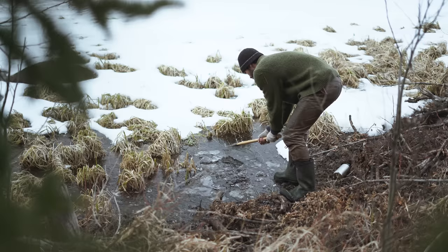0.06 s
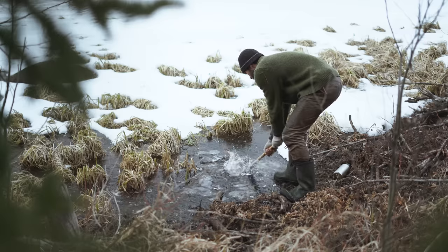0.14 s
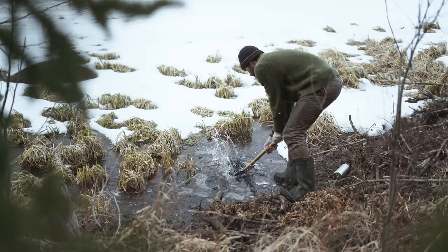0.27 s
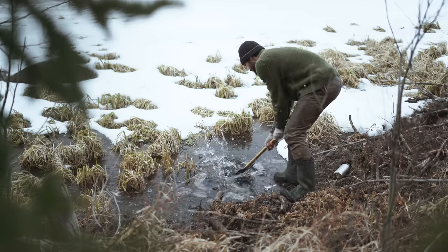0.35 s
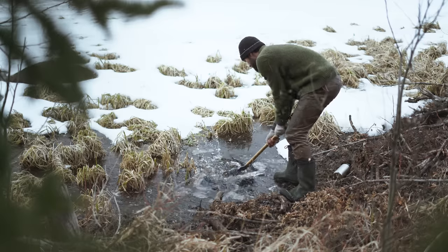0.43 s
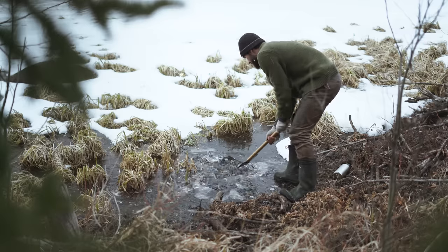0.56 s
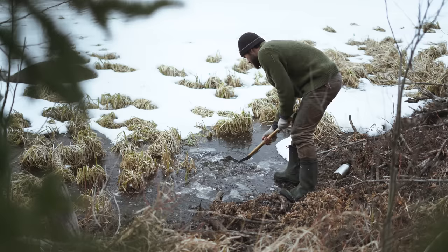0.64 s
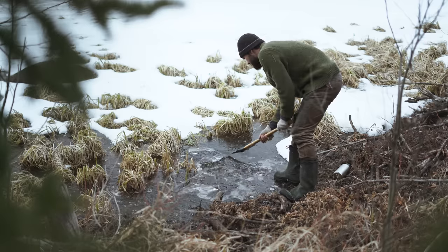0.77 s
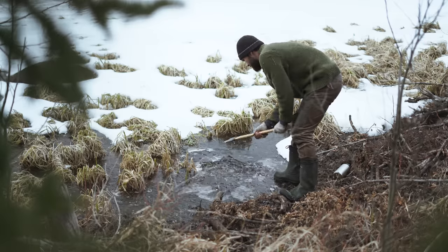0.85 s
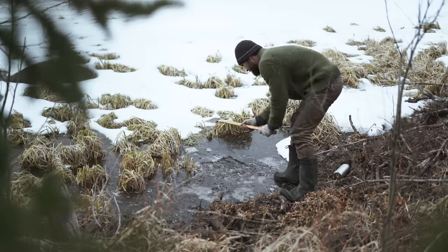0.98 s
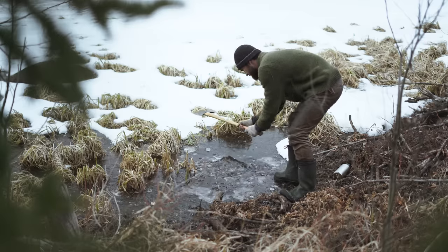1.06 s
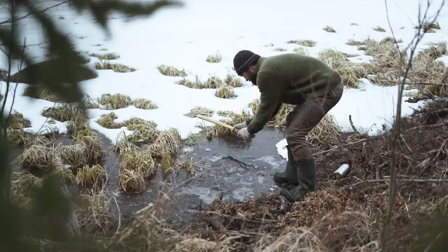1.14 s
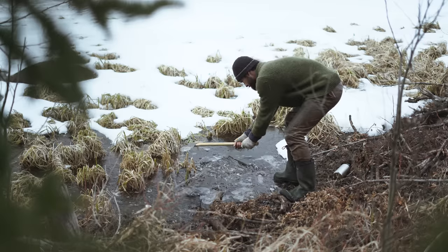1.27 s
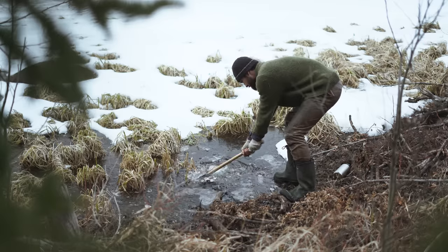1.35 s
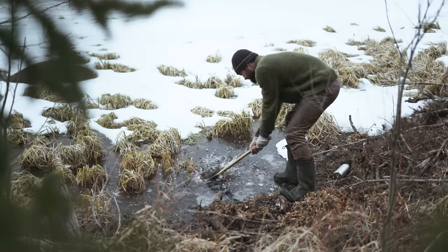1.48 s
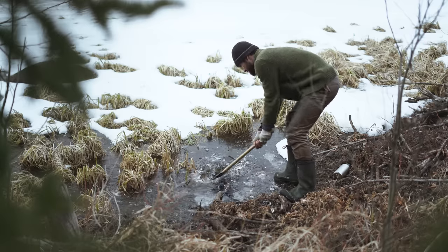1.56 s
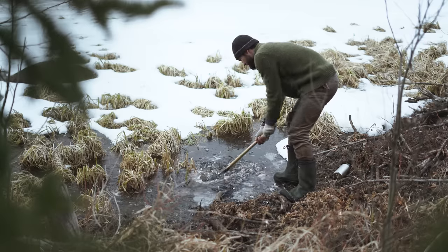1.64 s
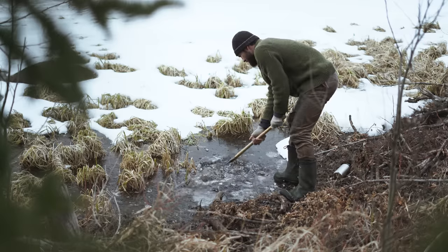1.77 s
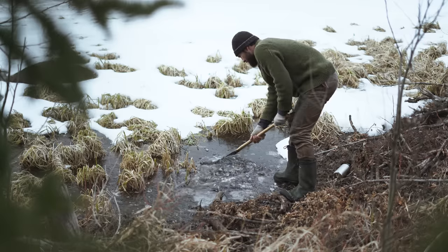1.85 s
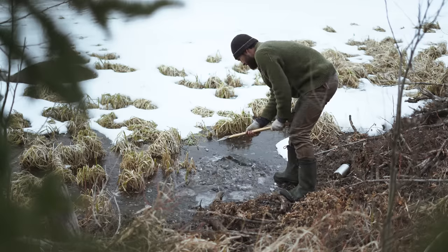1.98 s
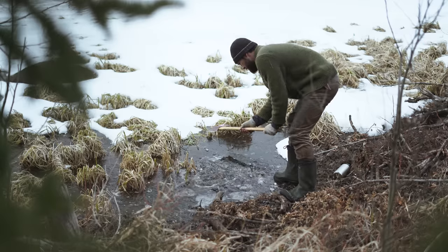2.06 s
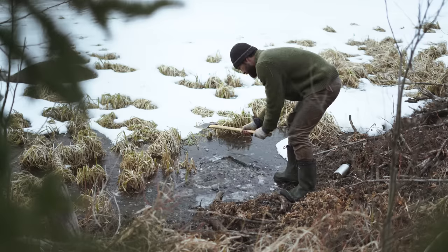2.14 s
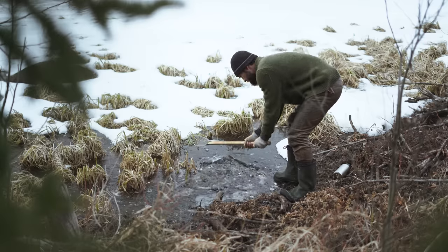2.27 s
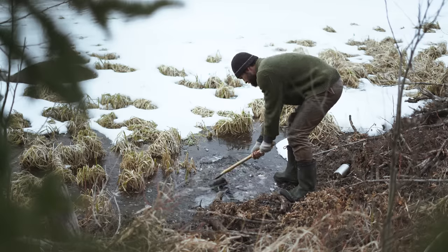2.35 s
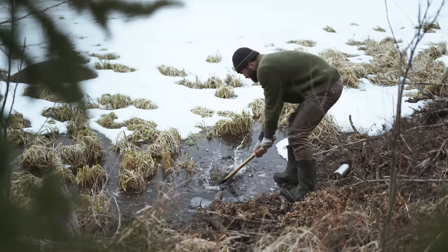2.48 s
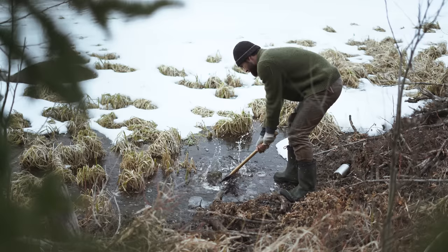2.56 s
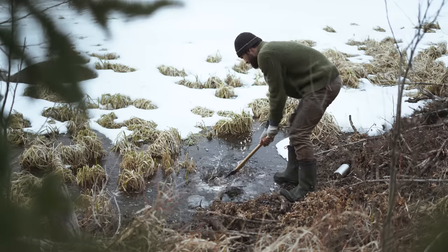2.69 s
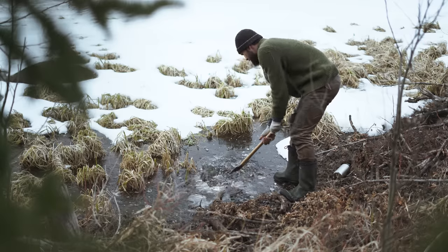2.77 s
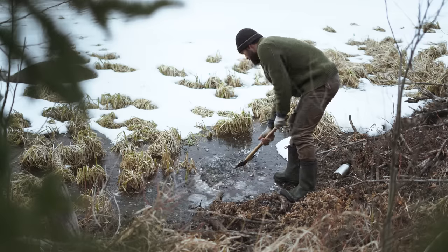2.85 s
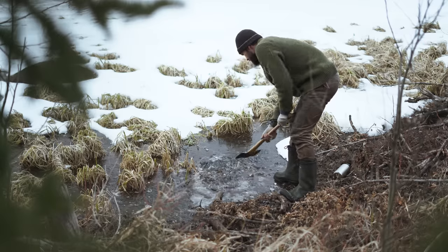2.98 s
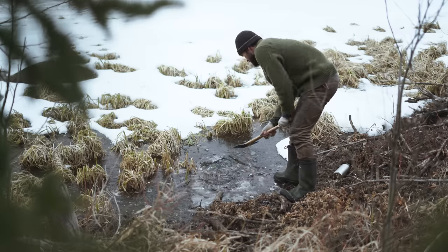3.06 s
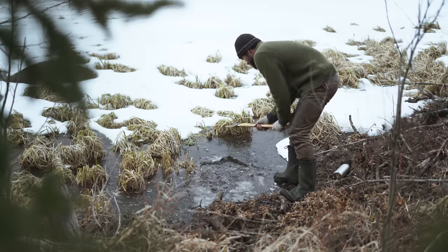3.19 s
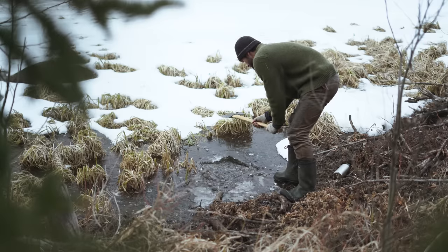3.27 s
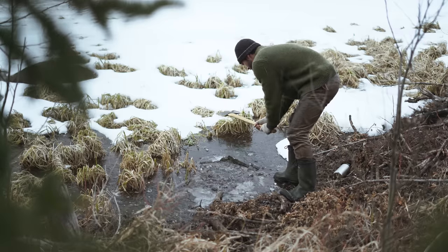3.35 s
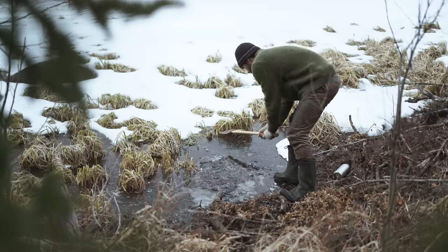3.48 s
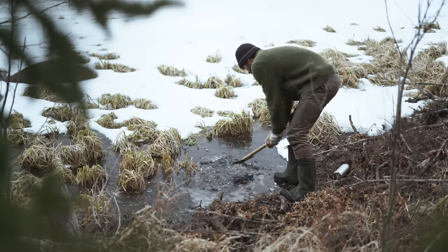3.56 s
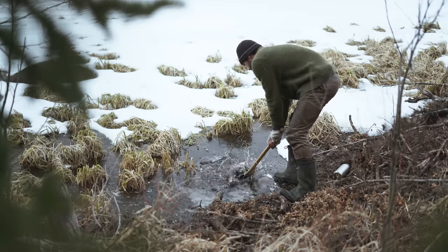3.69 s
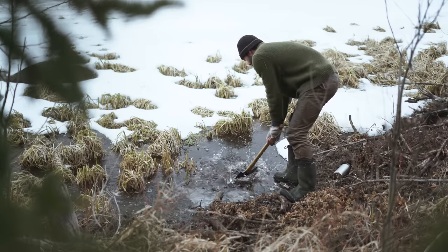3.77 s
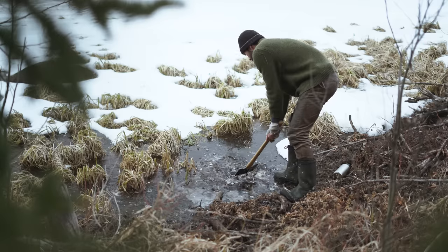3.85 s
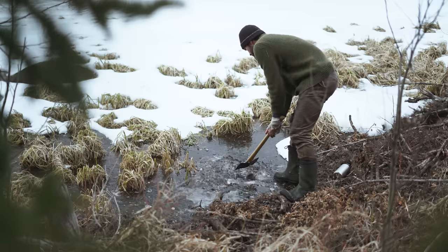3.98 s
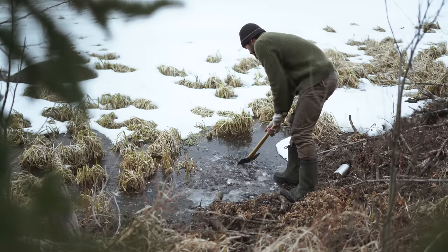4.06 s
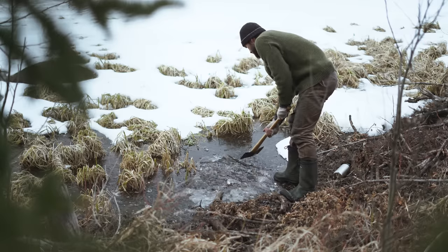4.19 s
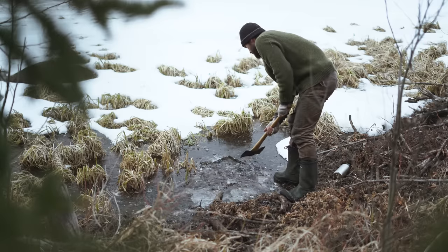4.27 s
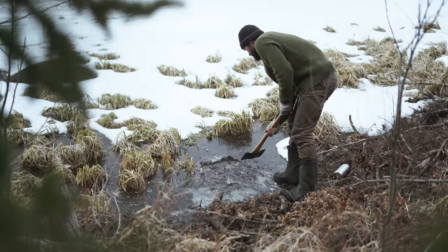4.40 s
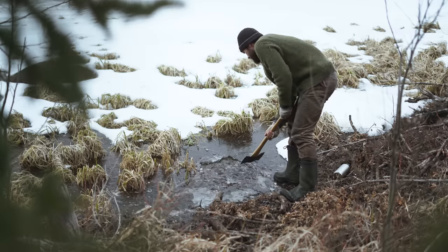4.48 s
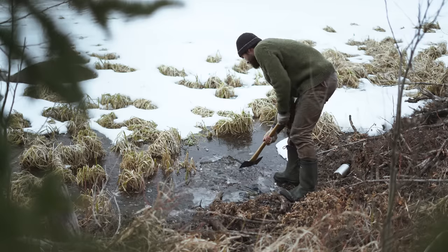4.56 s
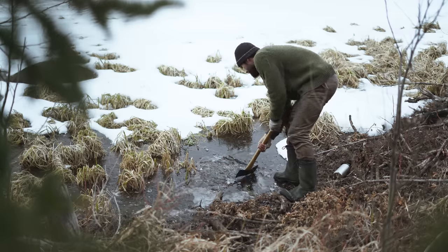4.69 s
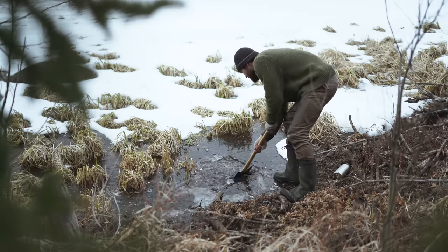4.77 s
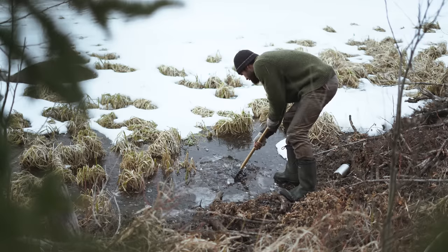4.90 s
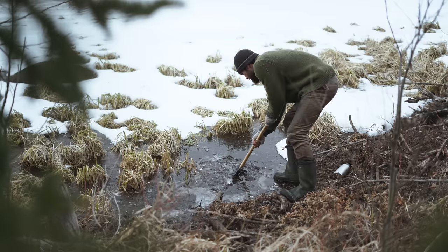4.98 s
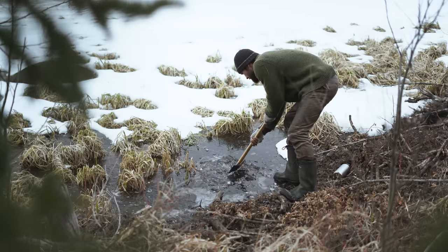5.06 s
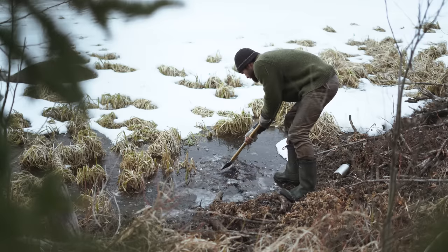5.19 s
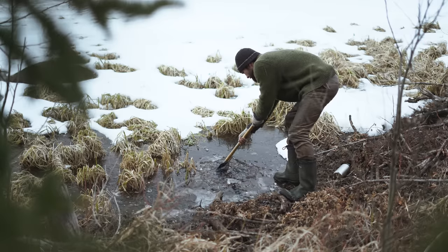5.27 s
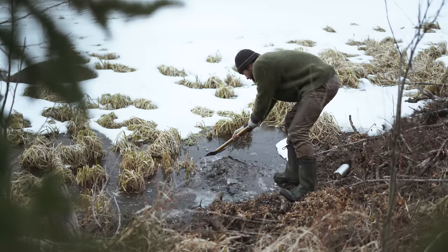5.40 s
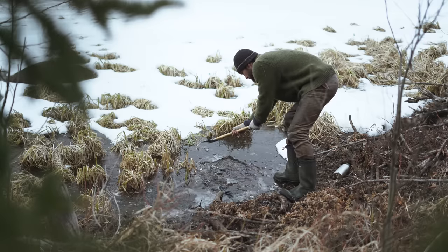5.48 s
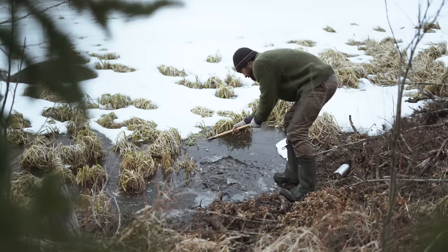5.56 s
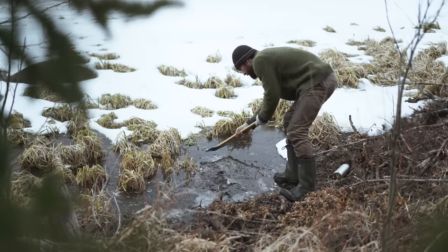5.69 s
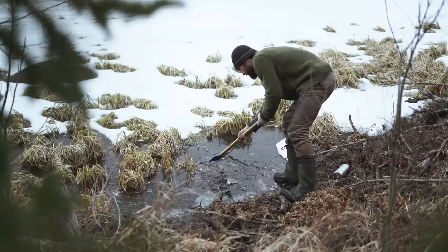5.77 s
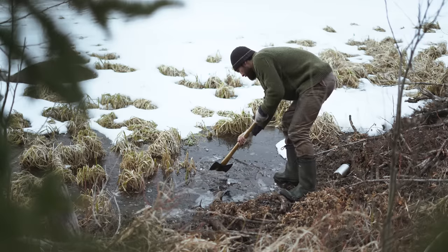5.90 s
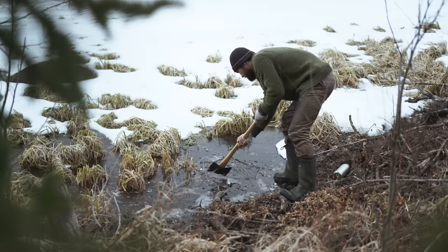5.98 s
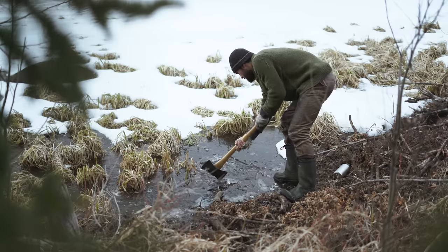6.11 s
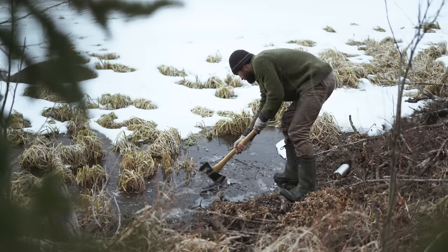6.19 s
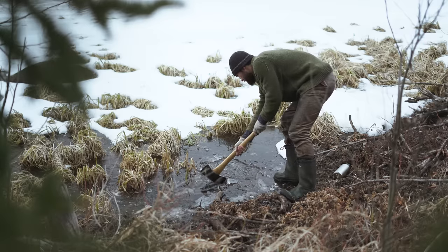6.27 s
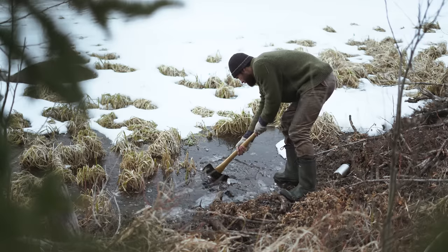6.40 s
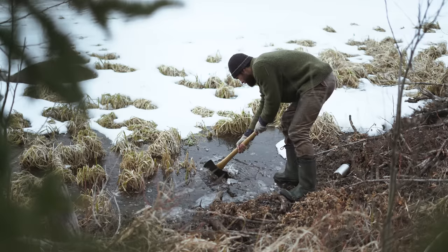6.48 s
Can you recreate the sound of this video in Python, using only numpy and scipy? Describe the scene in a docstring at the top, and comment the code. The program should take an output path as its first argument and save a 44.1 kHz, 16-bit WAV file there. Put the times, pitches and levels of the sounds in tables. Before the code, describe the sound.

Four hard chops crunch through thin ice into shallow water, shards and drops pattering back, followed by softer sloshing, bubbles and faint steel clinks.

```python
"""At the edge of a marsh an axe breaks thin ice four times, then stirs the floating pieces.
Fracture is a dense burst of tiny blips; single cracks and knocks are filtered impulses with a brief ring.
Water and shards rain back as bubbly grains and filtered noise, bubbles glide upward and the steel head
clinks in its modes. A near-mono microphone hears it over distant outdoor hush and light wind, clipping
at full scale."""
import sys
import numpy as np
from scipy import signal
from scipy.fft import rfft, irfft
from scipy.io import wavfile
from scipy.ndimage import uniform_filter1d

SR = 44100
rng = np.random.default_rng(int(sys.argv[2]) if len(sys.argv) > 2 else 0)


def master_out(mix):
    """Clip the mix to full scale and print it as 16-bit PCM to the path in sys.argv[1]."""
    frames = np.transpose(np.atleast_2d(mix))
    ceiling = np.clip(frames, -1, 1)
    pcm = np.round(ceiling * 32767).astype(np.int16)
    wavfile.write(sys.argv[1], SR, pcm)


N = 288414  # samples

# spectrum of treble spit, fizz and fine spray: (frequency [Hz], relative level [dB])
FIZZ_SPECTRUM = [(4000, 1), (6500, -10), (8000, -6.5), (11000, -3), (16000, -8)]
# spectrum of bright splintering, snaps and pattering drops: (frequency [Hz], relative level [dB])
SPLINTER_SPECTRUM = [(1200, -19.5), (2400, 7), (3400, 8.5), (4500, 5), (5200, -10), (6000, -23),
                     (8000, -54)]
# spectrum of dull knocks and gurgling water: (frequency [Hz], relative level [dB])
KNOCK_SPECTRUM = [(40, -78), (150, -26.5), (300, -10), (700, 2), (1600, 2.5), (2600, 0), (4000, -37.5)]


def amp(db):
    """Level: 20 dB is a tenfold amplitude ratio."""
    return 10 ** (np.asarray(db) / 20)


def evened(x):
    """Normalization: scales the mean power, and so the rms, to 1."""
    return x / np.sqrt(np.mean(x ** 2) + 1e-20)


def smoothed(x, width):
    """Low-pass filtering: two moving averages leave a slow random drift of rms 1."""
    return evened(uniform_filter1d(uniform_filter1d(x, width), width))


def read(points, hz):
    """Spectral interpolation: a table is read along a log-frequency axis."""
    f, value = np.transpose(points)
    return np.interp(np.log(hz + 1), np.log(f + 1), value)


def add(mix, s, sound):
    """Superposition: adds a sound to the mix from s seconds on."""
    part = mix[round(s * SR):][:len(sound)]
    part += sound[:len(part)]


def colour(points):
    """Minimum-phase filtering: the Hilbert transform of log gain gives causal taps, here of peak 1."""
    hz = abs(np.fft.fftfreq(4096, 1 / SR))
    log_gain = np.log(amp(read(points, hz)))
    response = np.exp(np.conj(signal.hilbert(log_gain)))
    taps = np.fft.ifft(response).real[:1024]
    return taps / abs(taps).max()


def through(x, points):
    """Linear filtering: colours x with a spectrum and scales it to rms 1."""
    return evened(signal.oaconvolve(x, colour(points))[:N])


def clicks(per_s, spread_db):
    """Random point process: independent clicks of either sign, a few of them large."""
    chance, size, sign = rng.random(N), rng.exponential(1, N), rng.choice([-1., 1.], N)
    return (chance < per_s / SR) * sign * amp(spread_db * np.minimum(size, 5))


def grains(per_s, cycles, glide, spread_db, body, count):
    """Granular superposition: short rising blips, fracturing ice when brief, small bubbles when longer."""
    out, train = np.zeros(N), clicks(per_s, spread_db)
    kind = rng.integers(0, count, N)  # which pitch each click sounds
    for k, hz in enumerate(np.geomspace(250, 5800, count)):
        u = np.arange(int(3 * cycles * SR / hz)) * hz / SR  # time in cycles
        envelope = u / cycles * np.exp(-3.1 * u / cycles)
        blip = envelope * np.sin(2 * np.pi * u * (1 + glide * u / cycles))
        out += amp(read(body, hz)) * np.sqrt(hz) * signal.oaconvolve(train * (kind == k), blip)[:N]
    return evened(out)


def hush():
    """Partial coherence: distant wind and water as random spectra, faintly patchy, partly alike left and right."""
    # spectrum of the hush: (frequency [Hz], relative level [dB per Hz])
    hush_spectrum = [(60, -9.5), (130, 1), (250, 2.5), (800, -8.5), (1600, -24), (2500, -32.5),
                     (4000, -23.5), (6300, -26.5), (12000, -26.5), (16000, -27)]
    # left-right correlation: (frequency [Hz], likeness [1 = identical])
    likeness = [(60, 1), (240, 0.87), (950, 0.4), (3770, 0.82), (15000, 0.198)]
    frames, hz = N // 256 + 5, np.fft.rfftfreq(1024, 1 / SR)
    a, b, c, d, patches = rng.standard_normal((frames, 513, 5)).T
    patches = evened(uniform_filter1d(uniform_filter1d(patches, 12, 0), 14, 1))
    same = np.clip(read(likeness, hz), -1, 1)[:, None]
    left, other = a + 1j * b, c + 1j * d
    right = same * left + np.sqrt(1 - same ** 2) * other
    gain = amp(read(hush_spectrum, hz)[:, None] + 1.5 * patches)
    noise = signal.istft(np.array([left, right]) * gain, nperseg=1024, noverlap=768)[1][:, :N]
    return amp(-54) * evened(noise)


def wind():
    """Flow noise: light wind rumbles on the microphone, partly shared and partly separate in each channel."""
    # strength of the shared rumble ahead of the band limit: (time [s], level [dB])
    wind_levels = [(0.0, -69), (1.2, -61), (1.42, -64), (3.3, -71.5), (3.37, -74), (3.88, -69.5),
                   (4.3, -68.5), (5.1, -74), (5.28, -70), (6.54, -79)]
    # spectrum of the rumble: (frequency [Hz], relative level [dB])
    rumble_spectrum = [(20, -0.5), (50, -0.5), (90, 5.5), (200, -35.5)]
    shared, *separate = [through(rng.standard_normal(N), rumble_spectrum) for _ in range(3)]
    level = amp(np.interp(np.arange(N) / SR, *np.transpose(wind_levels)))
    return level * (shared + .45 * np.array(separate))


def splash_levels():
    """Power addition: slosh, patter and spray swell, sag while water rains back, then settle to the calm."""
    # the axe throws or stirs the water: (time [s], slosh level [dB], patter level [dB], spray level [dB],
    # slosh sag time [s], patter sag time [s], spray sag time [s]); levels before the swell and fade
    splash_events = [(0.29, -36.5, -44, -51, 0.53, .75, .95), (1.528, -35, -46.5, -46.5, 0.26, .42, 0.47),
                     (2.56, -34.5, -45.5, -51, 0.25, 0.51, .4),
                     (3.12, -49.5, -61.5, -65.5, 0.13, 0.14, 0.11), (3.55, -56, -64.5, -68, 0.14, .12, .12),
                     (3.79, -35, -45, -54.5, .2, 0.27, .55), (4.848, -41, -46, -59, 0.027, 0.074, 0.11),
                     (5.4, -44.5, -49, -63, 0.019, 0.034, .06), (6.26, -52.5, -58, -64, .3, 0.24, 0.13),
                     (6.47, -49, -45, -66, .1, .1, .1)]
    # lapping of the calm water: (time [s], slosh level [dB])
    calm_levels = [(0, -51.5), (1.4, -51), (3.5, -55.5), (5.3, -55), (6.54, -56)]
    # shared shape of a splash: (slosh, patter, spray)
    swell_s = (0.025, 0.078, 0.032)  # rise time [s]
    sag_db_per_s = (11.5, 8.5, 3.5)  # fall while it lasts [dB/s]
    settle_db_per_s = (48.5, 77, 96)  # fall afterwards [dB/s]
    calm_patter_db, calm_spray_db = -70, -79
    t = np.arange(N) / SR
    calm_slosh_db = np.interp(t, *np.transpose(calm_levels))
    power = amp([calm_slosh_db, calm_patter_db + 0 * t, calm_spray_db + 0 * t]) ** 2
    for s, *row in splash_events:
        after = t[t >= s] - s
        for k, (db, lasts) in enumerate(zip(row[:3], row[3:])):
            sag_db = sag_db_per_s[k] * np.minimum(after, lasts)
            settle_db = settle_db_per_s[k] * np.maximum(after - lasts, 0)
            swell = np.minimum(after / swell_s[k], 1)
            add(power[k], s, (amp(db - sag_db - settle_db) * swell) ** 2)
    return 10 * np.log10(power)


def churn():
    """Bubble and impact noise: slosh over a wet wash, patter of drops and shards, and a fine spray above."""
    # spectrum of the wet wash: (frequency [Hz], relative level [dB])
    murmur_spectrum = [(150, -29.5), (400, 1), (900, 0), (1800, -6), (3200, -15.5), (5000, -32),
                       (7000, -43)]
    slosh_db, patter_db, spray_db = splash_levels()
    clumps = smoothed(rng.standard_normal(N), 220)  # drops land in bunches

    # calm water only murmurs, stirred water breaks into grains
    stir = np.clip((slosh_db + 58.5) / 9, 0, 1)
    small_bubbles = grains(1200, 8.03, 0.098, 3.87, KNOCK_SPECTRUM, count=24)
    gurgle = evened(small_bubbles + 0.72 * through(clicks(2500, 4.2), KNOCK_SPECTRUM))
    wash = through(rng.standard_normal(N), murmur_spectrum)
    slosh = stir * gurgle + np.sqrt(1 - .9 * stir ** 2) * wash

    # faint patter blurs into hiss
    falling = np.clip((patter_db + 68.5) / 9, 0, 1)
    drops = grains(4300, 4.4, 0.048, 4.3, SPLINTER_SPECTRUM, count=14)
    drops = evened(drops + 1.05 * through(clicks(2100, 4.0), SPLINTER_SPECTRUM))
    hiss = through(rng.standard_normal(N), SPLINTER_SPECTRUM)
    patter = falling * drops + (1 - falling) * hiss

    spray = .5 * through(clicks(1400, 4.5), FIZZ_SPECTRUM)
    spray += 0.63 * through(rng.standard_normal(N), FIZZ_SPECTRUM)
    return (amp(slosh_db + 2.36 * stir * clumps) * slosh
            + amp(patter_db) * evened(patter * amp(2.6 * clumps))
            + amp(spray_db) * evened(spray * amp(2.8 * clumps)))


def bank(x):
    """Diffuse reverberation: decaying noise stands for scattered returns from the bank, reeds and trees."""
    t = np.arange(SR // 3) / SR
    tail = rng.standard_normal(len(t)) * amp(-60 * t / 0.24) * (t > .004)
    return signal.oaconvolve(x, tail / np.linalg.norm(tail))[:N]


def blows():
    """Brittle fracture: each blow sets off a burst of breaks and a low push into the water; shoves only crunch."""
    # axe blows: (time [s], strength [dB], splinter level against the crunch [dB], treble level against
    # the crunch [dB], thump level against the strength [dB], crunch t60 [s], thump t60 [s], thump peak [Hz])
    blow_events = [(0.273, 4, -1, -24, -19.5, 0.092, 0.19, 448),
                   (1.5041, 1.6, -7.5, -18.5, -23, 0.16, 0.17, 300),
                   (2.532, 0.27, -3.5, -19, -23.5, 0.12, 0.16, 205),
                   (3.76, 1.2, -4.5, -16, -24.5, 0.11, 0.13, 244.5)]
    # shoves that crush loose ice: (time [s], crunch level before the rise and decay [dB],
    # treble level against it [dB], rise [s], t60 [s])
    shove_events = [(0.313, -17.5, -22, 0.0097, 0.076), (0.682, -25.5, -19, 0.0035, 0.089),
                    (1.203, -50, 8, 0.013, 0.13), (2.557, -20.5, -29, 0.0031, 0.084),
                    (2.94, -36.5, -7, 0.015, 0.081), (3.17, -41, -15, 0.0092, 0.092),
                    (3.788, -16.5, -29, 0.0053, 0.087), (4.0, -32, -29, 0.03, 0.06),
                    (4.862, -30.5, -37, 0.012, 0.44), (5.419, -31, -18, 0.011, 0.07),
                    (5.467, -25, -14, 0.013, 0.039), (6.515, -28.5, -28, 0.023, 0.11)]
    # spectrum of crunching ice: (frequency [Hz], relative level [dB])
    ice_spectrum = [(40, -87), (120, -40), (250, -17.5), (500, -4), (1200, 1), (2400, 0), (4500, -10.5),
                    (6000, -61), (8000, -23)]
    t = np.arange(SR // 2) / SR
    crunch, splinters, fizz, thump = np.zeros((4, N))
    for blow, water in zip(blow_events, rng.standard_normal((4, len(t)))):
        s, db, splinter_db, fizz_db, thump_db, t60, thump_t60, hz = blow
        burst = amp(db - 11.5 - 60 * t / t60) * np.minimum(t / 0.001, 1)
        add(crunch, s, burst)
        add(splinters, s, amp(splinter_db - 60 * t / 0.289) * burst)  # the brightest breaks come first
        add(fizz, s, amp(fizz_db) * burst)
        # the hole the blade opens
        cavity = colour([(40, -70), (140, -14), (hz, 0), (2 * hz, -22), (4 * hz, -60)])
        push = evened(signal.oaconvolve(water, cavity)[:len(t)])
        push_level = amp(db + thump_db - 60 * t / thump_t60) * np.minimum(t / 0.0028, 1)
        add(thump, s, push_level * push)
    for s, db, fizz_db, rise, t60 in shove_events:
        burst = amp(db - 60 * np.maximum(t - rise, 0) / t60) * np.minimum(t / rise, 1) ** 2
        add(crunch, s, burst)
        add(fizz, s, amp(fizz_db) * burst)
    crunch *= grains(4000, 3.08, 0.022, 3.03, ice_spectrum, count=20)
    fizz *= through(clicks(7000, 1.8), FIZZ_SPECTRUM)
    splinters *= grains(5000, 3, .02, 5, SPLINTER_SPECTRUM, count=16)
    return crunch + fizz + splinters + thump


def cracks():
    """Impulse response: a dull knock, bright snap, treble spit and brief ring of the piece or pocket of water."""
    # the loudest cracks, knocks of ice on ice and large drops, sounding about 1 ms after the time:
    # (time [s], strength [dB], initial ring frequency [Hz], then against the strength:
    # spit level before a 2.5 dB lift [dB], ring level [dB], snap level before a 2.5 dB lift [dB])
    crack_events = [(0.274, 1, 1145, -14.5, -6, -13), (0.292, -9, 1325, -32, 5, -24),
                    (0.326, -7, 1047, -25, -2, -34), (0.364, -20, 820, -16, 3.5, -19),
                    (0.391, -19, 1310, -15, -12, -14), (0.424, -18.5, 1410, -40, 2.5, -26),
                    (0.464, -25, 860, -5, -15, -15), (0.475, -21, 1610, -32, -5, 2),
                    (0.528, -24, 1700, -13, -3, -18), (0.542, -26, 842, -33, 5, -21),
                    (0.611, -24.5, 3020, -6.5, 4.5, -2), (0.683, 2, 2300, -51, -8.5, -15.5),
                    (0.694, -7.5, 1150, -27, -13, -8), (0.707, -17.5, 2130, -17, 3, -0.5),
                    (0.768, -13.5, 417, -11.5, -9, -16), (0.808, -20, 2000, -15, -2.5, -3),
                    (0.836, -20.5, 4360, -25, 3, 1.5), (0.876, -28, 2050, -22, 2, -16),
                    (0.904, -31.5, 754, -25, 1, -15), (0.946, -21, 1160, -13.5, -7, 1),
                    (1.092, -29.5, 807, -31, 2.5, -11), (1.137, -27.5, 880, -27, -13, -15),
                    (1.504, 3.5, 2224, -27, 2, -11), (1.525, -3, 1920, -30, -1, -36),
                    (1.562, -2.5, 2230, -31, -1.5, -29), (1.577, -11.5, 1290, -27, -7, -7),
                    (1.613, -11, 463, -17.5, -8.5, -13), (1.681, -24, 360, -24, -1, -11),
                    (1.863, -24, 510, -32, -5, -26), (1.757, -20, 2160, -30, -15, -1.5),
                    (1.807, -22, 800, -10, -5, -10), (1.897, -19.5, 2030, -20, 0.5, -10),
                    (1.96, -13.5, 680, -50, 0.5, -21), (1.994, -12, 1010, -30, -10, -14.5),
                    (2.029, -27.5, 744, -9.5, 1, -19), (2.052, -35.5, 600, -34, 7.5, -26),
                    (2.152, -33.5, 1084, -40, 2, -19), (2.379, -30.5, 648, -44, -0.5, -13),
                    (2.533, 2.5, 2100, -19, -1.5, -20), (2.542, 0.5, 1624, -27, 0, -24),
                    (2.549, 4, 1310, -40, -23, -33), (2.719, -18, 1410, -45, -4.5, -17),
                    (2.768, -18, 898, -24, -0.5, -19), (2.802, -27.5, 1900, -11, 11.5, -5),
                    (2.892, -17, 1740, -42, -1, -12.5), (2.916, -19.5, 1780, -18, -3, -6),
                    (2.946, -18, 1201, -11, -25, -1.5), (2.985, -22.5, 1990, -17, 7, -18),
                    (3.064, -23.5, 859, -39, -5.5, -28), (3.175, -25, 1900, -12.5, -3.5, -26),
                    (3.189, -31.5, 1460, -31, 6, -22), (3.2, -31, 1360, -35, -1, -2),
                    (3.239, -31, 516, -32, -20, -7), (3.477, -36, 970, -35, -0.5, -41),
                    (3.542, -30, 890, -25, -11, -23), (3.602, -27.5, 2480, -8.5, 5.5, -2),
                    (3.608, -26.5, 970, -11, -6.5, -8), (3.694, -35.5, 1050, -34, -0.5, -26),
                    (3.76, -2, 1480, -9.5, -5, 2.5), (3.771, 2.5, 1290, -26, -8.5, -36),
                    (3.795, -3.5, 633, -42, -11, -31), (3.819, -16, 766, -38, -0.5, -30),
                    (3.843, -0.5, 745, -56, -7.5, -21), (3.905, -15, 3090, -40, -3.5, -12),
                    (3.928, -19.5, 1074, -31, 2.5, -8), (3.975, -24.5, 2450, -32, -1, -4.5),
                    (4.014, -14.5, 870, -25, -2.5, -9), (4.087, -27, 804, -20, -0.5, -22),
                    (4.169, -30.5, 2100, -23, 1, -6), (4.228, -37, 750, -34, 5.5, -22),
                    (4.278, -31.5, 1090, -14, -2.5, -4), (4.672, -37.5, 1040, -26.5, 2, -22),
                    (4.852, -22.5, 3000, -22.5, -5, -3), (4.861, -11, 2750, -45, -8, -13),
                    (4.876, -9, 1620, -37, -16, -2.5), (4.884, -7, 1190, -50, -17, -16),
                    (4.974, -20.5, 1920, -40, -10, -15), (4.904, -14, 1110, -41, -13, -30),
                    (4.93, -15, 1030, -25, -10.5, -22), (5.115, -28, 745, -21, -7.5, -8),
                    (5.411, -10, 1320, -50, -20, -19), (5.423, -17.5, 2800, -28, -8, -10),
                    (5.516, -31, 2760, -14, -10, 3), (5.433, -19.5, 2180, -21, -7, -6),
                    (5.476, -16.5, 2700, -24, -10, -2), (5.505, -33, 3300, -18, 0, -2),
                    (5.537, -31.5, 2280, -24, 2, -4), (5.555, -25.5, 1600, -22, -5, -10),
                    (5.743, -38, 1560, -32, 0, -24), (5.78, -36, 1160, -32, -1, -17),
                    (6.006, -42, 693, -40, -18, 6), (6.14, -42, 2900, -32, -5, 0.5),
                    (6.476, -36, 1690, -26, 5, -12), (6.5, -30, 3090, -33, 3, -22),
                    (6.277, -30, 3560, -32, -26, 1.5), (6.3, -33, 2780, -11, -14, 4),
                    (6.33, -17, 2650, -23, -15, -11), (6.38, -23, 816, -22, -15, 0),
                    (6.415, -23, 2520, -28, -4, -22), (6.52, -25, 2610, -29, -1, -13),
                    (6.533, -12.5, 890, -41, -8, -26)]
    out, t = np.zeros(N), np.arange(3000) / SR
    short = t[:600]
    colours = [colour(c) for c in (KNOCK_SPECTRUM, SPLINTER_SPECTRUM, FIZZ_SPECTRUM)]
    for crack, burst in zip(crack_events, rng.standard_normal((len(crack_events), 600))):
        s, db, hz, spit_db, ring_db, snap_db = crack
        rough = np.sign(burst) * (.5 + .5 * abs(burst))
        sharp = rough * amp(-60 * short / 0.0022)  # a break is over in a moment
        spit = rough * amp(-60 * short / 0.017) * np.minimum(short / 0.00044, 1)
        levels_db = (-4, snap_db + 2.5, spit_db + 2.5)  # knock, snap, spit
        for drive, taps, part_db in zip((sharp, sharp, spit), colours, levels_db):
            part = np.convolve(drive, taps[:300])
            add(out, s + .001, amp(db + part_db) * part / abs(part).max())
        t60 = 0.029 * min(1200 / hz, 1)  # small pieces are damped sooner
        envelope = amp(-60 * t / t60) * np.minimum(t / 0.0014, 1)
        ring = np.sin(2 * np.pi * hz * t * (1 + 0.67 * t)) * envelope
        add(out, s + 0.000997, amp(db + ring_db) * ring)
    return out


def bubbles():
    """Cavity resonance: a bubble shrinks as it rises, so its tone glides up, wavering as the water shakes it."""
    # bubbles that close as they rise, before the wavering:
    # (time [s], length [s], first frequency [Hz], last frequency [Hz], level [dB])
    bubble_events = [(1.621, 0.036, 610, 790, -33.5), (1.791, 0.041, 689, 990, -38),
                     (3.235, 0.052, 402, 1276, -45.5), (4.962, 0.053, 725, 1466, -39),
                     (5.021, 0.027, 780, 915, -38.5), (5.043, 0.041, 943, 1184, -40),
                     (5.116, .03, 710, 800, -42.5), (5.565, 0.072, 475, 1080, -33.5),
                     (5.662, 0.069, 424, 1270, -45.5), (6.018, 0.048, 600, 2360, -47.5),
                     (6.403, 0.024, 1170, 2040, -38), (6.495, 0.0155, 990, 2120, -48),
                     (5.071, 0.019, 1220, 1690, -39), (5.087, 0.017, 1190, 1900, -39),
                     (6.463, 0.017, 1320, 1800, -49), (6.505, 0.02, 1520, 2320, -37.5),
                     (5.129, 0.019, 890, 1410, -52)]
    out = np.zeros(N)
    shake = smoothed(rng.standard_normal((2, N)), 180)
    for s, length, first_hz, last_hz, db in bubble_events:
        u = np.arange(int(length * SR)) / (length * SR)  # 0 to 1 over its life
        wobble, flutter = shake[:, int(s * SR):][:, :len(u)]
        hz = first_hz * (last_hz / first_hz) ** (u ** 0.9) * (1 + 0.01 * wobble)
        tone = np.sin(2 * np.pi * np.cumsum(hz) / SR)
        add(out, s, amp(db + 2.5 * flutter) * np.sin(np.pi * u ** 0.69) * tone)
    return out


def clinks():
    """Modal vibration: the axe head rings, fluttering as ice drags on it, until water smothers it."""
    # the steel head knocked by ice: (time [s], strength [dB], upper-mode level against it [dB],
    # time to damping by water, less 10 ms [s])
    clink_events = [(4.864, -27.5, -16, 0.045), (4.928, -34, -1, 0.014), (5.412, -40, 3, 0.1),
                    (5.478, -24.5, 4, .2), (6.299, -36.5, 0, 0.053), (6.33, -25.5, -9, 0.035),
                    (6.417, -31.5, -26, 0.013)]
    # modes of the axe head: (frequency [Hz], level against the strength [dB], t60 [s])
    head_modes = [(932, -12.5, 0.12), (2770, 1, 0.1), (3240, -8, 0.092), (4300, -27, .06), (5050, -20, .04),
                  (7070, -19.5, 0.36), (7130, -27, 0.43), (11500, -8, 0.032), (12110, -6, 0.043)]
    out, drag = np.zeros(N), smoothed(rng.standard_normal(N), 150)
    for s, db, high_db, length in clink_events:
        end = length + .01
        t = np.arange(int(end * SR)) / SR
        shape = np.clip((end - t) / 0.014, 0, 1) * np.minimum(t / 0.0012, 1)
        upper = amp(high_db) * np.minimum(t / 0.017, 1)  # the upper modes swell as the ice lets go
        for hz, mode_db, t60 in head_modes:
            ring = amp(db + mode_db - 60 * t / t60) * np.sin(2 * np.pi * hz * t) * shape
            add(out, s, ring * upper if hz > 6000 else ring)
    return out * amp(0.82 * drag)


def scene():
    """Superposition: the work at the ice in the middle, its returns, and the hush around it."""
    near = churn() + blows() + cracks() + bubbles() + clinks()
    return near + amp(-16) * bank(near) + hush()


def record(dry):
    """Transducer limits: unlike capsules, clipping at full scale, a bass cut, wind rumble and a band limit."""
    # treble that enters the two capsules with opposite sign: (frequency [Hz], gain [dB])
    capsule_difference = [(2500, -90), (5000, -61), (9000, -35), (16000, -39)]
    hz = np.fft.rfftfreq(N, 1 / SR)
    # 1j turns the phase by a quarter cycle
    unlike = irfft(1j * rfft(dry.mean(0)) * amp(read(capsule_difference, hz)), N)
    clipped = np.clip(dry + [[1], [-1]] * unlike, -1, 1)
    low_cut = signal.butter(5, 120, "high", fs=SR, output="sos")
    heard = signal.sosfilt(low_cut, clipped) + wind()
    band_limit = signal.firwin(511, 15950, window=("kaiser", 9), fs=SR)
    return signal.oaconvolve(heard, band_limit[None], "same")


dry = scene()
out = record(dry)
master_out(out)
```